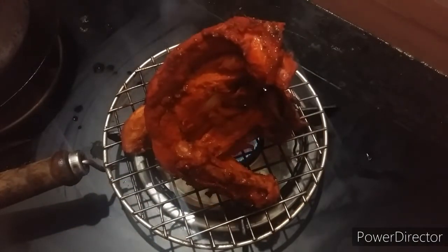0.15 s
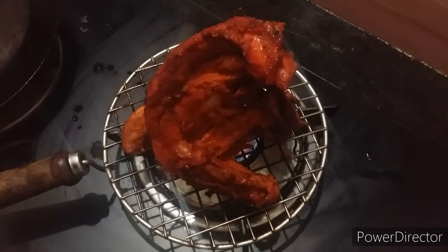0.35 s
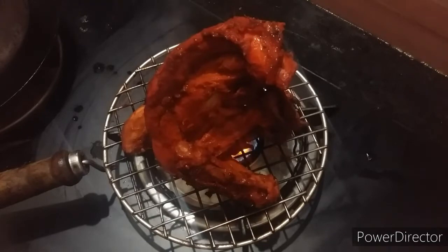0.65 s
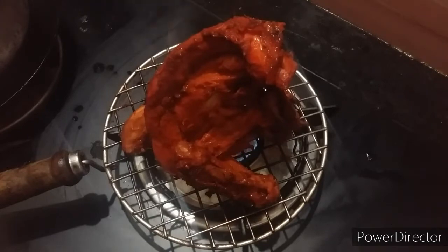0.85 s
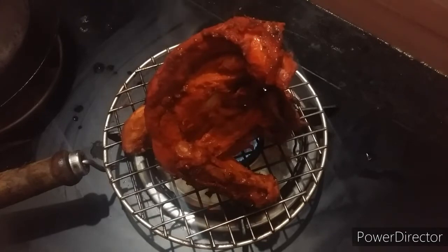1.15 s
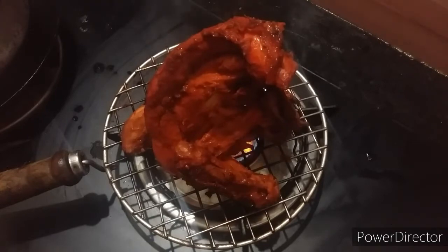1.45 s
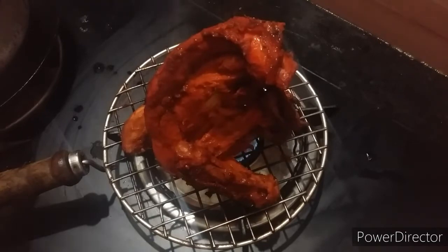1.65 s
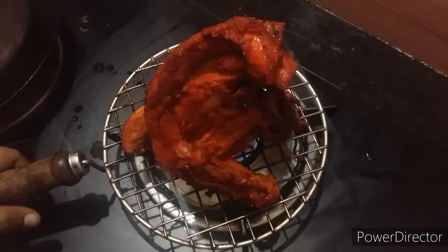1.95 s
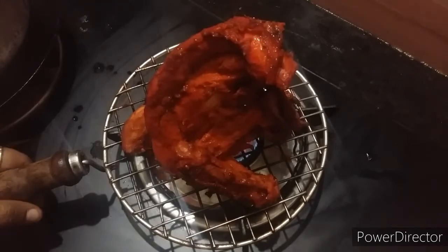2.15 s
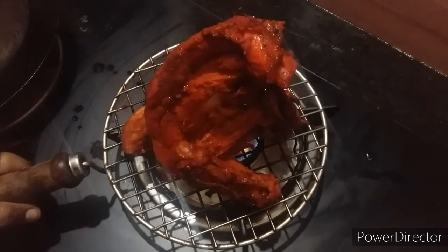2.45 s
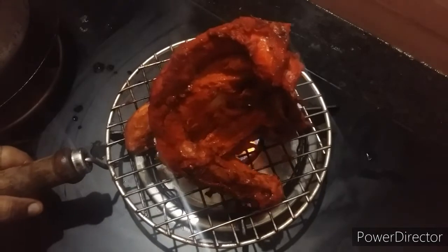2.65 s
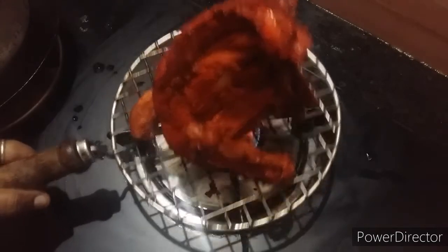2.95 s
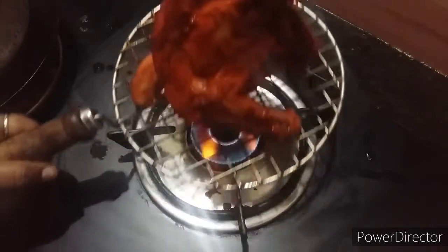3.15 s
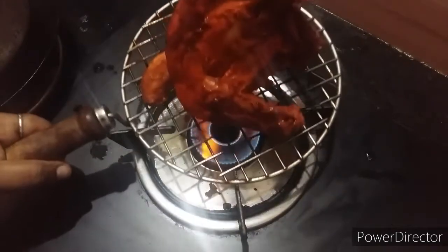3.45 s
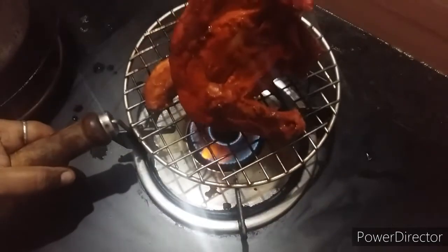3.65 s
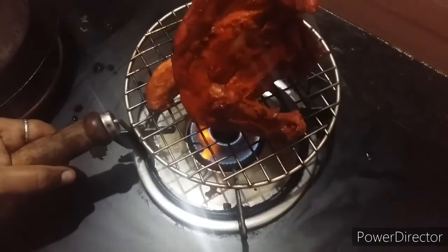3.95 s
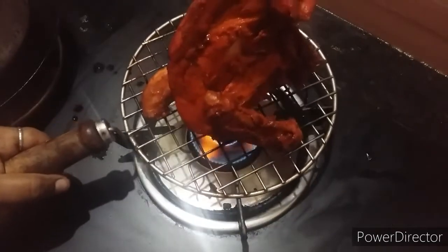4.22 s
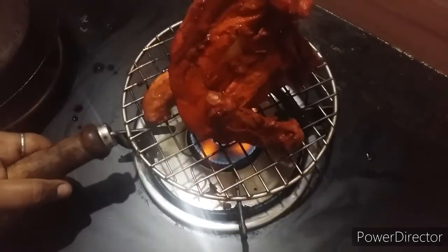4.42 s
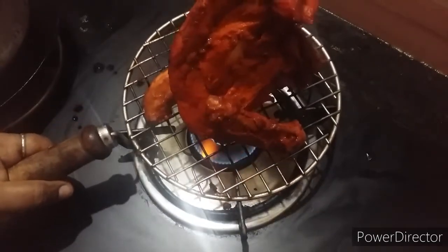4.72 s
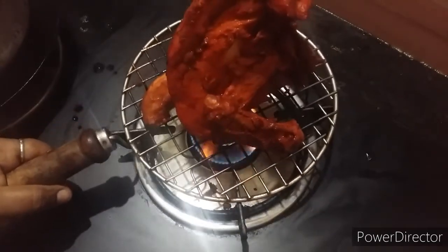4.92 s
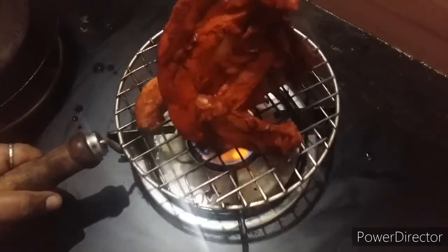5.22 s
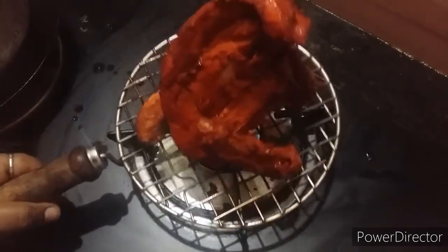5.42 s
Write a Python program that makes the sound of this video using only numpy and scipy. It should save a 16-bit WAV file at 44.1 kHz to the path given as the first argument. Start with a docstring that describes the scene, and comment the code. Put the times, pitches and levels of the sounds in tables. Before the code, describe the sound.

Quiet close-up of meat cooking on a gas burner, the sizzle, low flame and soft rubbing rising and sinking unevenly. A far-off panel slam with quick rebounds dominates the opening and dies away in the room, followed by a muffled heavy thump. Later come close metal clunks, short low judders and bright ticks from the rack as a hand moves it, then a quieter ending.

```python
"""Chicken sizzles faintly on a wire rack over a gas burner in a hard-walled kitchen, close to a small microphone.
Fat, flame and rubbing are shaped noise that rises and sinks as the recorder's noise suppressor opens and closes.
A hand lifts the rack by its wooden handle: it knocks and its hot wires tick (struck modes), and it scrapes
(noise strokes). Across the room something bangs and rattles as echo and panel modes, then a dull thump follows
in low pushes. Faint washes of noise fade at the start and at the thump; hiss swells after louder sounds."""
import sys
import numpy as np
from scipy import signal
from scipy.fft import rfft, irfft, next_fast_len
from scipy.io import wavfile
from scipy.ndimage import uniform_filter1d, map_coordinates

SR = 44100
rng = np.random.default_rng(int(sys.argv[2]) if len(sys.argv) > 2 else 0)


def file_out(sig):
    """Save sig as 16-bit WAV at sys.argv[1]."""
    # one column per channel
    cols = np.atleast_2d(sig).T
    # limit, then scale
    lim = np.clip(cols, -1, 1)
    pcm = np.round(lim * 32767).astype(np.int16)
    wavfile.write(sys.argv[1], SR, pcm)


N = 246209


def amp(db):
    """Amplitude factor of a level in dB."""
    return 10 ** (np.asarray(db) / 20)


def unit(x):
    """x scaled to rms 1."""
    return x / np.sqrt(np.mean(x ** 2) + 1e-20)


def along(points, hz):
    """Values read between (Hz, value) points on a log frequency axis."""
    f, v = np.transpose(points)
    return np.interp(np.log(hz + 1), np.log(f + 1), v)


def wobble(rate):
    """A smooth random curve, rate knots a second."""
    knots = rng.standard_normal(int(N * rate / SR) + 4)
    return map_coordinates(knots, [np.arange(N) * rate / SR])


def filtered(x, response):
    """x times a response of frequency, zero-padded so that its end does not wrap round."""
    size = next_fast_len(len(x) + SR // 4)
    hz = np.fft.rfftfreq(size, 1 / SR)
    return irfft(rfft(x, size) * response(hz), size)[:len(x)]


def coloured(x, spectrum, tilt_db=0):
    """x with the given spectrum, tilted in dB per octave, at rms 1."""
    return unit(filtered(x, lambda hz: amp(along(spectrum, hz) + tilt_db * np.log2(hz + 20))))


def add(track, s, sound):
    """Mix a sound into the track at time s."""
    start = round(s * SR)
    track[start:start + len(sound)] += sound[:N - start]


def ring(modes, t, tilt_db=0, scatter_db=1):
    """Damped modes, struck at slightly new strengths each time."""
    hz, db, t60 = np.transpose(modes)[:, :, None]
    level = db + tilt_db * np.log2(hz / hz[0]) + scatter_db * rng.standard_normal(hz.shape)
    fade = np.exp(-np.log(1000) * t / t60)
    tones = np.sin(2 * np.pi * (hz * t + rng.random(hz.shape)))
    return np.sum(amp(level) * fade * tones, axis=0)


# How long the hard-walled kitchen rings on. Each row: frequency in Hz, time to fall 60 dB in seconds.
KITCHEN_T60 = [(100, 0.38), (400, 0.38), (1200, 0.48), (3000, 0.5), (5500, 0.5), (10000, 0.47)]


def dying(noise):
    """Noise that fades as the kitchen does, each frequency at its own speed."""
    hz, t, z = signal.stft(noise, SR, nperseg=256)
    fade = amp(-60 * t / along(KITCHEN_T60, hz)[:, None])
    return signal.istft(z * fade, SR, nperseg=256)[1][:len(noise)]


# Colour of the fat close to the microphone. Each row: frequency in Hz, relative level in dB.
FAT_SPECTRUM = [(1000, -39), (1700, -19), (2190, -13.5), (2360, -9), (2550, -20), (2890, -16), (3210, -9),
                (3660, -3.5), (3790, -0.5), (3980, 1), (5080, -5), (5500, -7.5), (5900, -12.5), (6900, -16),
                (9000, -20), (11700, -36), (19800, -120)]


def sizzle(level_db):
    """Countless bubbles of fat burst in clumps, over a flickering fizz."""
    clumps_db = wobble(28)
    bursts = (rng.random(N) < 900 / SR) * rng.uniform(-0.75, 1, N) * amp(2 * clumps_db)
    fizz = coloured(rng.standard_normal(N), FAT_SPECTRUM) * amp(1.1 * clumps_db + 1.44 * wobble(64))
    return amp(level_db) * unit(fizz + .5 * coloured(bursts, FAT_SPECTRUM))


# Colour of the gas flame under the rack. Each row: frequency in Hz, relative level in dB.
FLAME_SPECTRUM = [(15, -49), (25, -23), (43, -25), (80, -3.5), (150, -7.5), (195, 1), (241, -5.5),
                  (352, -17), (387, -24.5), (420, -11.5), (550, -37), (920, -120)]


def burner(level_db):
    """The gas flame flutters with a soft low roar."""
    flutter_db = 1.4 * wobble(13)
    return amp(level_db + flutter_db) * coloured(rng.standard_normal(N), FLAME_SPECTRUM)


# Colour of the rack against its support, close by. Each row: frequency in Hz, relative level in dB.
RUB_SPECTRUM = [(140, -12), (230, -1.5), (287, -11.5), (384, 1.5), (429, -6.5), (519, 0), (613, -4.5),
                (766, 1.5), (958, -4), (1210, -0.5), (1350, -4), (2160, -12), (2890, -10.5), (3300, -14.5),
                (4290, -44), (7260, -120)]


def rubbing(level_db):
    """Tiny slips of the rack on its support, over a soft rush."""
    slips = rng.standard_normal(N) * (rng.random(N) < 160 / SR)
    rush = coloured(rng.standard_normal(N), RUB_SPECTRUM)
    return amp(level_db) * unit(rush + .5 * coloured(slips, RUB_SPECTRUM))


# Openings of the recorder's noise suppressor, heard on the steady sounds.
# Each row: time of the crest in seconds, rise in dB, length in seconds.
SUPPRESSOR_OPENINGS = [(0.01, 8, 0.55), (0.638, 5, 0.34), (1.157, 7.5, 0.28), (1.382, 7.5, 0.2),
                       (1.61, 4.5, 0.52), (1.866, 5.5, 0.25), (2.08, 3, 0.092), (2.246, 3, .12),
                       (2.406, 6.5, 0.31), (2.935, 7.5, 0.8), (3.856, 7.5, 0.58), (4.243, 6.5, 0.43),
                       (4.584, 8, 0.56), (5.3, 0.5, 0.49)]


def openings():
    """Rise in dB over the resting level: each opening is a smooth hump, and overlapping humps add."""
    t = np.arange(N) / SR
    return sum(db * np.cos(np.pi * np.clip((t - s) / length, -.5, .5)) ** 2
               for s, db, length in SUPPRESSOR_OPENINGS)


SIZZLE_DB, FLAME_DB, RUB_DB = -65.1, -71, -68.5  # at rest
SIZZLE_SHARE, FLAME_SHARE = 0.62, 1.13  # dB for each dB of opening
SIZZLE_FADE_DB_PER_S = 0.34  # the fat calms once the chicken is lifted
# The rack is lifted, and its rubbing eases for a moment.
LIFT_S, CLEAR_S, CLEAR_DROP_DB = 3, 0.76, 3.5


def steady():
    """The recorder's noise suppressor opens and closes, so sizzle, flame and rubbing rise and sink together.

    Lifting the rack eases the rubbing and calms the fat."""
    since_lift = np.maximum(np.arange(N) / SR - LIFT_S, 0)
    opening_db = openings()
    clear = np.sin(np.pi * np.minimum(since_lift / CLEAR_S, 1))
    fat = sizzle(SIZZLE_DB + SIZZLE_SHARE * opening_db - SIZZLE_FADE_DB_PER_S * since_lift)
    flame = burner(FLAME_DB + FLAME_SHARE * opening_db)
    return fat + flame + rubbing(RUB_DB + opening_db - CLEAR_DROP_DB * clear)


# Knocks of the rack on its support, close by.
# Each row: start in seconds, peak level in dB, treble tilt in dB per octave.
RACK_KNOCKS = [(1.563, -46.5, 4), (2.811, -46.5, -0.5), (2.979, -37, -3.5), (3.093, -51, 3),
               (3.71, -29.5, 2), (3.8428, -47, -9), (3.8758, -41, 5.5), (4.188, -49.5, -5),
               (4.57, -51, -11), (4.610, -45, 2), (5.236, -52.5, 3), (5.3979, -51, 5)]
# Modes of the rack with its handle.
# Each row: frequency in Hz, relative level in dB, time to fall 60 dB in seconds.
RACK_MODES = [(334, -2.5, 0.041), (385.6, 2.5, 0.069), (474, -1.5, 0.04), (764, -16, 0.018),
              (1007, -5.5, 0.029), (1222, 1.5, 0.021), (1512, -7.5, 0.047), (2375, -7, 0.03),
              (2940, -12.5, 0.032), (3550, -0.5, 0.021), (3986, -13.5, 0.059)]
CONTACT_S = 0.0027  # a knock builds up this fast


def knocks():
    """The loaded rack bumps the burner's support: its modes ring with a short scuff, duller or brighter."""
    out, t = np.zeros(N), np.arange(SR // 4) / SR
    for s, db, tilt_db in RACK_KNOCKS:
        tone = ring(RACK_MODES, t, tilt_db)
        scuff = .12 * coloured(rng.standard_normal(len(t)), RUB_SPECTRUM, tilt_db) * np.exp(-t / .008)
        blow = (tone / np.abs(tone).max() + scuff) * (1 - np.exp(-t / CONTACT_S))
        add(out, s, amp(db) * blow / np.abs(blow).max())
    return out


# Strokes of the rack dragged over its support, close by.
# Each row: start in seconds, judder level in dB, wire rasp level in dB, length in seconds.
DRAG_STROKES = [(2.882, -55, -64, .06), (2.946, -53, -57.5, 0.075), (3.01, -58, -55, 0.063),
                (3.667, -66, -61.5, 0.033), (3.72, -58.5, -80, 0.23), (3.971, -63, -60.5, 0.066),
                (4.13, -56, -72, 0.06), (4.201, -64, -59, .15)]
# Colour of the low judder. Each row: frequency in Hz, relative level in dB.
JUDDER_SPECTRUM = [(80, -50), (160, 2), (260, -3.5), (380, 1), (500, -5), (650, -7), (1000, -12.5),
                   (1600, -33), (4000, -52)]


def dragging():
    """The loaded rack judders low and its wires rasp as it is pulled over its support."""
    out = np.zeros(N)
    for s, judder_db, rasp_db, length in DRAG_STROKES:
        t = np.arange(int(length * SR)) / SR
        judder = amp(judder_db) * coloured(rng.standard_normal(len(t)), JUDDER_SPECTRUM)
        rasp = amp(rasp_db) * coloured(rng.standard_normal(len(t)), FAT_SPECTRUM)
        stroke = np.sqrt(np.sin(np.pi * t / length))
        add(out, s, stroke * (judder + rasp))
    return out


# Ticks of the hot wires, close by. Each row: start in seconds, peak level of the ring in dB.
WIRE_TICKS = [(3.039, -47), (3.276, -45.5), (3.48, -44), (3.954, -49), (4.1869, -36.5), (4.57, -38.5),
              (4.583, -48), (4.7925, -54.5), (4.906, -49)]
# Modes of the wires. Each row: frequency in Hz, relative level in dB, time to fall 60 dB in seconds.
WIRE_MODES = [(1790, -22, 0.014), (3064, -13, 0.026), (3890, 4, 0.024), (4040, -11.5, 0.082),
              (4450, 15.5, 0.0085), (5080, -11, 0.011), (5080, -23, 0.011)]
# Colour of the spit in a tick. Each row: frequency in Hz, relative level in dB.
SPIT_SPECTRUM = [(200, -2), (1200, -18.5), (2000, -10), (4500, -4.5), (6500, -10.5), (9300, -15),
                 (11000, -30), (16000, -64)]
SNAP_S, SPIT_S = 0.0011, 0.0058  # a tick builds up this fast; its spit fades this fast
FAINT_TICK_DB, SPIT_DB = -54.5, -50  # peaks of a faint tick's ring and of its spit
SPIT_GROWS = 0.49  # dB of spit for each dB of ring


def ticks():
    """Hot wires snap over each other: a short ring with a spit of noise."""
    out, t = np.zeros(N), np.arange(SR // 16) / SR
    snap = 1 - np.exp(-t / SNAP_S)
    for s, db in WIRE_TICKS:
        tone = ring(WIRE_MODES, t, scatter_db=1.5) * snap
        spit = coloured(rng.standard_normal(len(t)), SPIT_SPECTRUM) * snap * np.exp(-t / SPIT_S)
        spit_db = SPIT_DB + SPIT_GROWS * (db - FAINT_TICK_DB)
        add(out, s, amp(db) * tone / np.abs(tone).max() + amp(spit_db) * spit / np.abs(spit).max())
    return out


# Blows of the bang across the room.
# Each row: start in seconds, level of the echo before it fades in dB, treble tilt in dB per octave.
BANG_BLOWS = [(.245, -26, 4), (.257, -25.5, -1.15), (.287, -40, 3), (.333, -27, 0.5), (.357, -36, -2.5),
              (0.41, -39.5, -4)]
# Colour of the banged panel. Each row: frequency in Hz, relative level in dB.
PANEL_SPECTRUM = [(40, -49), (80, -24), (125, -9), (175, 0), (300, -2), (480, -5), (650, -6), (1250, -5.5),
                  (2000, -10.5), (3900, -12), (5400, -20), (6500, -30.5), (8000, -41.5), (12000, -58.5)]
# Modes of the banged panel.
# Each row: frequency in Hz, relative level in dB, time to fall 60 dB in seconds.
PANEL_RING = [(165.6, 9, 0.33), (195.8, 2.5, 0.63), (338, 1, 0.4), (487.5, 7.5, 0.55), (511.6, 9.5, 0.48),
              (707, 3, 0.52), (877, 1, 0.64), (936, -59, 0.27), (1138, 4.5, 0.37), (1274, 4, 0.6),
              (1620, 6.5, 0.32), (1693, -5, 0.64), (2250, -11, 0.83), (2816, -15, 0.6)]
BANG_RISE_S = 0.0015  # the echo of a blow builds up this fast


def bang():
    """A panel slams and rebounds far off, so it arrives mostly as the kitchen's echo."""
    out, t = np.zeros(N), np.arange(SR) / SR
    for s, db, tilt_db in BANG_BLOWS:
        # wall reflections come sparsely at first, then crowd into a wash
        density = np.minimum(1, (3000 + 8000 * (t / .05) ** 2) / SR)
        reflections = rng.choice([-1, 1], SR) * (rng.random(SR) < density) / np.sqrt(density)
        echo = dying(coloured(reflections, PANEL_SPECTRUM, tilt_db))
        add(out, s, amp(db) * echo * (1 - np.exp(-t / BANG_RISE_S)))
    # the direct crack and the panel's own ring start with the first blow
    crack = coloured(rng.standard_normal(SR), PANEL_SPECTRUM, tilt_db=3.0) * np.exp(-t / 0.0023)
    body = ring(PANEL_RING, t) * (1 - np.exp(-t / 0.016))
    add(out, BANG_BLOWS[0][0], amp(-32.0) * crack + amp(-21.5) * body / np.abs(body).max())
    return out


# Soft low pushes of the thumps, away from the stove.
# Each row: start in seconds, level of the push in dB, pitch in Hz.
THUMP_PUSHES = [(1.056, -47, 113), (1.107, -49, 140), (1.135, -45.5, 79), (1.163, -47.5, 154.8),
                (5.39, -59.5, 92.5)]
# Colour of the floor under the thumps. Each row: frequency in Hz, relative level in dB.
BOOM_SPECTRUM = [(20, -21), (45, -15), (100, -5), (170, -6), (230, -24), (500, -39), (1500, -60)]
PUSH_S = 0.0404  # length of a push
BOOM_DB, BOOM_RISE_S, BOOM_FADE_S = 1, 0.0061, 0.016  # boom over its push before shaping; its rise and fade


def thump():
    """Something heavy and soft lands in a few low pushes, one more near the end; each makes the floor boom."""
    out, t, tail = np.zeros(N), np.arange(int(PUSH_S * SR)) / SR, np.arange(SR // 3) / SR
    boom_shape = (1 - np.exp(-tail / BOOM_RISE_S)) * np.exp(-tail / BOOM_FADE_S)
    for s, db, hz in THUMP_PUSHES:
        add(out, s, amp(db) * np.sin(np.pi * t / PUSH_S) * np.sin(2 * np.pi * hz * t))
        boom = coloured(rng.standard_normal(len(tail)), BOOM_SPECTRUM) * boom_shape
        add(out, s, amp(db + BOOM_DB) * boom)
    return out


# Faint fading washes of noise: an earlier bang's echo at the start, then background at the thump.
# Each row: start in seconds, level before the fade in dB, treble tilt in dB per octave.
FADING_WASHES = [(0.0, -51.5, 8.5), (1.067, -55, 0.5)]
WASH_RISE_S = .004


def washes():
    """An earlier bang's echo dies at the start; at the thump the suppressor lets background through."""
    out, t = np.zeros(N), np.arange(SR) / SR
    for s, db, tilt_db in FADING_WASHES:
        wash = dying(coloured(rng.standard_normal(SR), PANEL_SPECTRUM, tilt_db))
        add(out, s, amp(db) * wash * (1 - np.exp(-t / WASH_RISE_S)))
    return out


def kitchen(x):
    """The walls answer a sound after a short delay, with a dying tail of unit energy."""
    tail = dying(rng.standard_normal(SR)) * (np.arange(SR) > .008 * SR)
    return signal.fftconvolve(x, tail / np.linalg.norm(tail))[:N]


# Colour of the recorder's hiss. Each row: frequency in Hz, relative level in dB.
HISS_SPECTRUM = [(100, 3.5), (2000, -2), (7000, -1.5), (11000, -1.5), (15500, -1.5)]
# The recorder's noise suppressor lets more hiss through while the scene is loud.
HISS_DB, OPEN_ABOVE_DB, OPEN_RANGE_DB = -66.5, -59, 10
OPEN_SLOPE = 0.58  # dB of hiss for each dB of sound above the threshold
SENSE_S, OPEN_LAG_S = 0.034, 0.049  # it averages the level over this long, and follows this slowly


def hiss(sound):
    """A thin even hiss, held down in the quiet and let through as it lags behind louder sounds."""
    power = np.abs(uniform_filter1d(sound ** 2, int(SENSE_S * SR)))
    level_db = 10 * np.log10(power + 1e-20)
    wanted_db = np.clip(OPEN_SLOPE * (level_db - OPEN_ABOVE_DB), 0, OPEN_RANGE_DB)
    keep = np.exp(-1 / (OPEN_LAG_S * SR))
    open_db = signal.lfilter([1 - keep], [1, -keep], wanted_db, zi=wanted_db[:1])[0]
    return amp(HISS_DB + open_db) * coloured(rng.standard_normal(N), HISS_SPECTRUM)


def scene():
    """The stove close by, with the bang and the thump farther off in the kitchen."""
    rack, wire, low = knocks(), ticks(), thump()
    echo = kitchen(amp(-4.5) * rack + amp(-6.5) * wire + amp(-7) * low)
    stove = steady() + rack + dragging() + wire
    return (stove + bang() + low + washes() + echo)[None]


TOP_HZ = 15550  # the recorder's band limit


def record(dry):
    """The recorder adds its hiss and keeps nothing above its band limit."""
    return filtered(dry[0] + hiss(dry[0]), lambda hz: hz < TOP_HZ)[None]


dry = scene()
out = record(dry)
file_out(out)
```